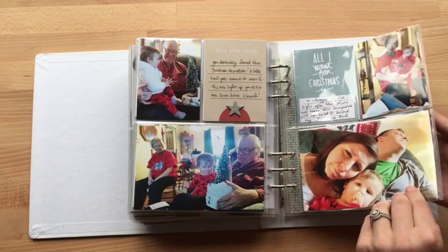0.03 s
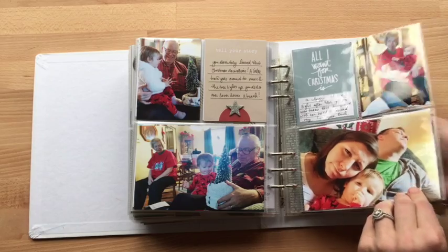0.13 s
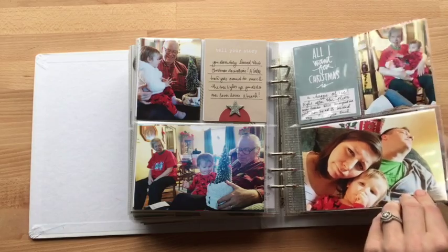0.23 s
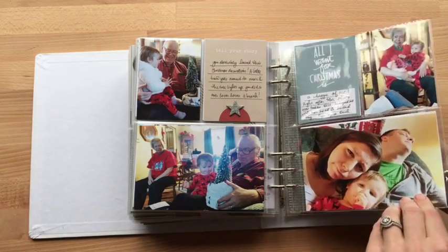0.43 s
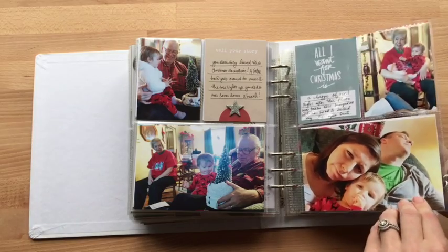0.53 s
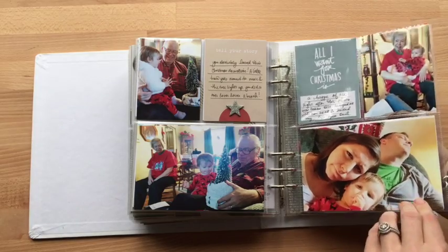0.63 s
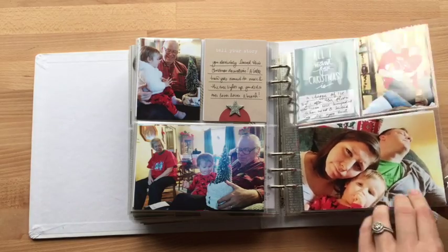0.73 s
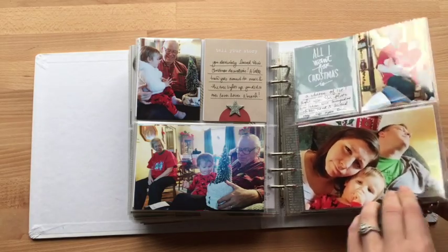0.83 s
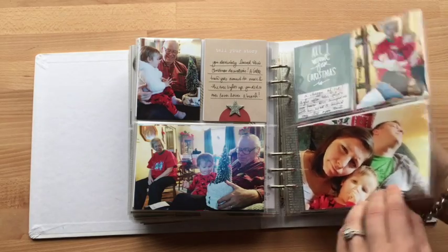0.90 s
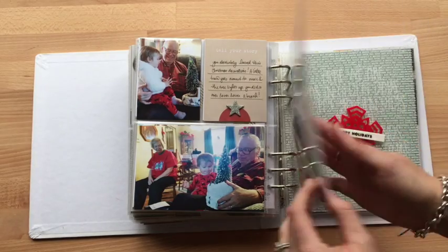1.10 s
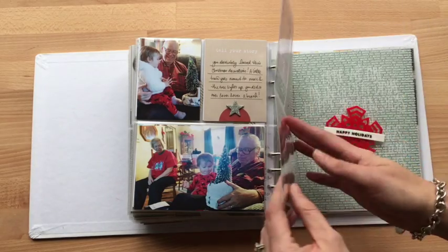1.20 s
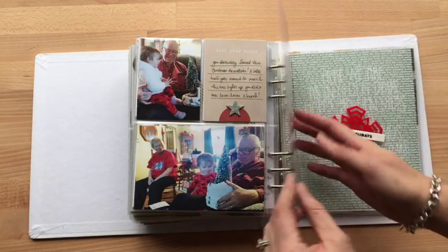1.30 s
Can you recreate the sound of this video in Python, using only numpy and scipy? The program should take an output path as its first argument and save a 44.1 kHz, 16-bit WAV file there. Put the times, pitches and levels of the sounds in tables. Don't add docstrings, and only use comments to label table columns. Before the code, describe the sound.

Stiff plastic album sleeve crackling, close and dry-edged. Light snaps at 0.02 and 0.14 seconds build to the loudest tight cluster at 0.21-0.27, with fine crackle and a short room tail. Quiet follows, then small flicks around 0.56 and 0.68, faint creases from 0.7 to 1.0, and a moderate snap near 1.26. Very faint motor hum, rattling buzz and hiss continue underneath.

```python
import sys
import numpy as np
from scipy import signal
from scipy.fft import rfft, irfft, next_fast_len
from scipy.io import wavfile
from scipy.ndimage import map_coordinates

SR = 44100
rng = np.random.default_rng(int(sys.argv[2]) if len(sys.argv) > 2 else 0)


def boost_factor(decibels):
    exponent = np.asarray(decibels, float) / 20
    return 10 ** exponent


def generate_wav(signal):
    frames = np.transpose(np.atleast_2d(signal))
    scaled = np.clip(frames, -1, 1) * 32767
    pcm = np.round(scaled).astype(np.int16)
    wavfile.write(sys.argv[1], SR, pcm)


N = 59535

# f/Hz, level/dB
FILM_RESPONSE = [(100, -35), (270, -1), (450, -6), (1500, -1.5), (2400, -4), (3150, -4.5), (4400, -10.5),
                 (5600, -15)]


def unit(x):
    return x / np.sqrt(np.mean(x ** 2) + 1e-20)


def along(points, hz):
    f, v = np.transpose(points)
    return np.interp(np.log(hz + 1), np.log(f + 1), v)


def wobble(rate_hz):
    knots = rng.standard_normal(int(N * rate_hz / SR) + 4)
    return map_coordinates(knots, [np.arange(N) * rate_hz / SR])


def filtered(x, response):
    m = next_fast_len(N + SR // 2)
    return irfft(rfft(x, m) * response(np.fft.rfftfreq(m, 1 / SR)), m)[:N]


def causal(points):
    def response(hz):
        cepstrum = irfft(np.log(boost_factor(along(points, hz))))
        half = len(cepstrum) // 2
        folded = np.r_[cepstrum[0], 2 * cepstrum[1:half], np.zeros(len(cepstrum) - half)]
        return np.exp(rfft(folded))[:len(hz)]
    return response


def air():
    # f/Hz, level/dB
    air_colour = [(90, 4), (230, -4), (500, -11), (1700, -7), (2150, -16.5), (3080, -4.5), (4200, -20),
                  (15000, -25)]
    noise = filtered(rng.standard_normal(N), lambda f: boost_factor(along(air_colour, f)) * (f > 70))
    return boost_factor(-73.5 + wobble(12)) * unit(noise)


def motor_hum(t):
    hum_hz, phase_cycles, waver_rad = 59, 0.42, 0.36
    phase = 2 * np.pi * (hum_hz * t + phase_cycles) + waver_rad * wobble(27)
    return np.sqrt(2) * boost_factor(-67.5 + 1.2 * wobble(7.7)) * np.sin(phase)


def motor_ticks(t):
    # f/Hz, width/Hz, level/dB
    case_modes = [(1780, 130, -4), (3090, 380, 0)]
    tick_hz, start_s, t60_s, spread_db = 60, 0.007, 0.02, 2
    cycle = (t - start_s) * tick_hz
    sizes = boost_factor(spread_db * rng.standard_normal(200))
    size = sizes[np.floor(cycle).astype(int) + 1]
    rattle = size * boost_factor(-60 * (cycle % 1) / tick_hz / t60_s) * rng.standard_normal(N)

    def case(f):
        total = 0
        for k, (hz, width_hz, db) in enumerate(case_modes):
            damping = 1j * f * width_hz
            total = total + (-1) ** k * boost_factor(db) * damping / (hz * hz - f * f + damping)
        edge = boost_factor(-23) * np.exp(-((f - 7000) / 2500) ** 2)
        return total ** 2 + edge

    return boost_factor(-76) * unit(filtered(rattle, case))


def crackle():
    # t/s, bending effort/dB
    handling = [(0, -63), (.125, -82), (0.138, -52.5), (.2, -59), (0.234, -42.5), (.3, -55), (0.421, -76.5),
                (.55, -86.5), (0.569, -60.5), (0.601, -88), (.66, -79.5), (0.691, -67), (.72, -84.5),
                (0.799, -73.5), (.92, -68), (0.938, -91.5), (1.201, -77), (1.27, -77.5)]
    slips_per_s, spread_db, level_db, growth = 2000, 3.5, 3, 0.92
    hits = rng.random(N) < slips_per_s / SR
    size = boost_factor(spread_db * np.minimum(rng.exponential(size=N), 3))
    slips = hits * size * rng.choice([-1, 1], N)
    grains = unit(filtered(slips * boost_factor(4.2 * wobble(70)), causal(FILM_RESPONSE)))
    s, effort_db = np.transpose(handling)
    most_db = effort_db.max()
    now_db = np.interp(np.arange(N) / SR, s, effort_db)
    return boost_factor(level_db + most_db + growth * (now_db - most_db)) * grains


def ring(t, hz, t60_s, rise_s):
    shape = boost_factor(-60 * t / t60_s) * (1 - np.exp(-t / rise_s))
    return shape / shape.max() * np.sin(2 * np.pi * hz * t)


def burst(t, hz, cycles):
    hump = np.sin(np.pi * np.clip(t * hz / cycles, 0, 1) ** 0.65)
    return hump * np.sin(2 * np.pi * hz * t)


def buckle(t, cycles, hz, bright_db, edge_db, click):
    detune = 1 + 0.029 * rng.standard_normal(3)
    bright_hz, edge_hz, knock_hz, thud_hz = 3087 * detune[0], 5510 * detune[1], 690 / detune[2], 290 * detune[2]
    body = np.sqrt(max(1 - boost_factor(2 * bright_db), 0.02)) * burst(t, hz, cycles)
    bright = burst(t, bright_hz, 4.34) + 0.06 * ring(t, bright_hz, 0.057, 0.0008)
    edge = ring(t, edge_hz, 0.0087, 0.00022) * (1 + 2.1 * rng.standard_normal(len(t)))
    knock = ring(t, knock_hz, 0.04, 0.0018) * (bright_db < -3)
    thud = ring(t, thud_hz, 0.06, 0.0032)
    pop = boost_factor(0.5) * body + boost_factor(-1.5 + bright_db) * bright + boost_factor(-3 + edge_db) * edge
    return pop + boost_factor(-22) * knock + boost_factor(-26) * click + boost_factor(-27) * thud


def snaps():
    # t/s, peak level/dB, f/Hz, bright part/dB, edge/dB
    lift = [(0.0239, -33, 2184, 6.5, -18), (0.1315, -32.5, 1360, -6, -15.5), (0.141, -49, 1480, 1, -20),
            (0.1456, -25.5, 1474, -5.5, -24), (0.164, -51.5, 1700, 10.5, -29), (.184, -48, 1300, 7, -26),
            (0.192, -45, 1260, 7, -22), (0.209, -19.5, 1810, -9.5, -29), (0.224, -29.5, 1280, -32, -45.5),
            (0.2262, -42.5, 1550, -14, -22), (0.2355, -12, 1690, -3.5, -13), (.2387, -13.5, 1596, -8, -16),
            (0.247, -18, 1214, -4, -14), (0.2531, -26, 1410, -4, -14), (.262, -40, 1270, -2, -20),
            (.274, -36, 1214, -8, -22)]
    turn = [(.577, -51, 743, -1, -13.5), (0.705, -52, 1300, -7, -2), (0.768, -60, 1790, -20, -19),
            (.793, -48.5, 1770, -2.5, -14), (0.811, -48, 1720, -4, -13.5), (0.854, -47, 1510, -13, -38.5),
            (0.901, -43.5, 1243, -0.5, -22.5), (.971, -58, 1300, -20, -23), (1.063, -70, 1780, -2, 12.5),
            (1.211, -54.5, 1024, -8.5, -29), (1.225, -53, 800, 0, -20), (1.2585, -36, 1080, 0, -20.5),
            (1.268, -53, 1026, -4, -30), (1.273, -53, 1780, -2, -32), (1.281, -63, 910, 12.5, -28)]
    flick = [
        (.5637, -41, 1300, -8, -26),
        (.6545, -53, 1500, -5, -22),
        (.6826, -35, 1274, -6.5, -11.5),
        (.8325, -51, 890, -3, -24),
        (1.2582, -47, 1700, -20, -26),
        (.2352, -21, 800, -20, -30),
    ]
    lag_s = 0.0001
    t = np.arange(SR // 20) / SR
    click = filtered(np.arange(N) == 0, causal(FILM_RESPONSE))[:len(t)]
    click = click / np.abs(click).max()
    pops = []
    for events, cycles in ((lift, 3.07), (turn, 3.07), (flick, 1.49)):
        for s, db, hz, bright_db, edge_db in events:
            pop = boost_factor(db) * buckle(t, cycles, hz, bright_db, edge_db, click)
            pops.append((round((s + lag_s) * SR), pop))
    return pops


def room_answer(x):
    # f/Hz, t60/s
    room_t60 = [(200, 0.59), (600, 0.58), (1500, 0.37), (3500, 0.39), (9000, 0.49)]
    gap_s, desk_t60_s, desk_gain, level_db = 0.0015, 0.045, 3, -5.5
    hz, t, z = signal.stft(rng.standard_normal(SR // 2), SR, nperseg=256)
    fade = boost_factor(-60 * t / along(room_t60, hz)[:, None]) + desk_gain * boost_factor(-60 * t / desk_t60_s)
    tail = signal.istft(z * fade, SR, nperseg=256)[1]
    tail = np.pad(tail / np.linalg.norm(tail), (round(gap_s * SR), 0))
    return boost_factor(level_db) * signal.fftconvolve(x, tail)


def microphone(x):
    # f/Hz, level/dB
    roll_off = [(3400, -1.5), (4400, -9.5), (5600, -13.5), (7500, -15.5), (10000, -27.5), (16000, -46)]
    low_cut_hz = 140
    return filtered(x, lambda f: (1j * f / (low_cut_hz + 1j * f)) ** 2 * causal(roll_off)(f))


def scene():
    t = np.arange(N) / SR
    background = air() + motor_hum(t) + motor_ticks(t)
    fine = crackle()
    fine = fine + room_answer(fine)[:N]
    album = np.zeros(N + 2 * SR)
    for start, pop in snaps():
        wet = room_answer(pop)
        album[start:start + len(pop)] += pop
        album[start:start + len(wet)] += wet
    return (microphone(album[:N] + fine) + background)[None]


def band_limit(x):
    return signal.sosfilt(signal.butter(12, 15740, fs=SR, output="sos"), x)


def record(dry):
    return band_limit(dry)


dry = scene()
out = record(dry)
generate_wav(out)
```